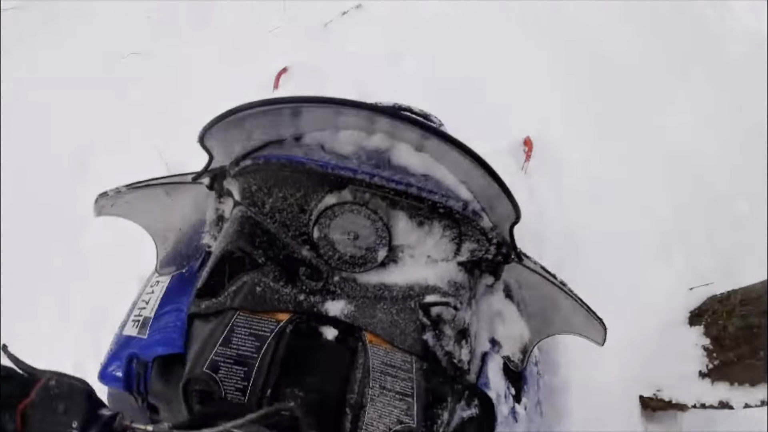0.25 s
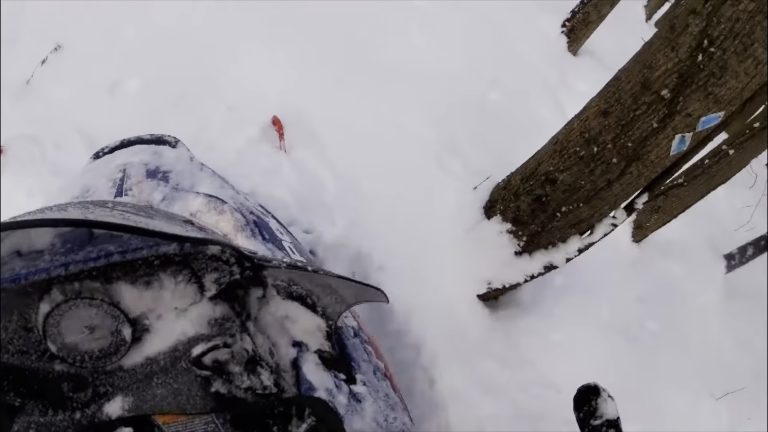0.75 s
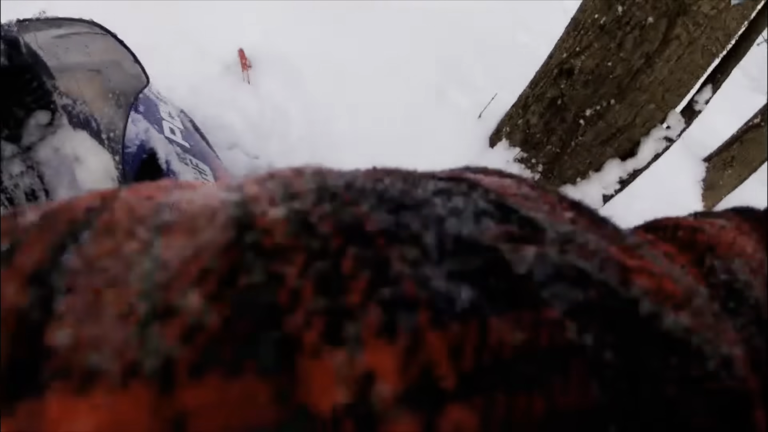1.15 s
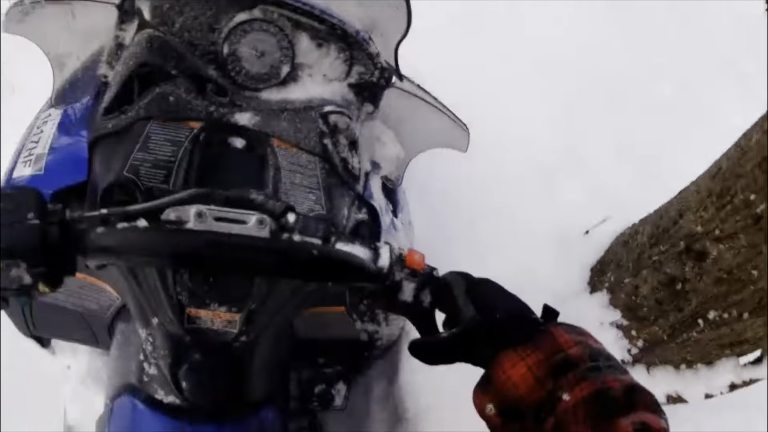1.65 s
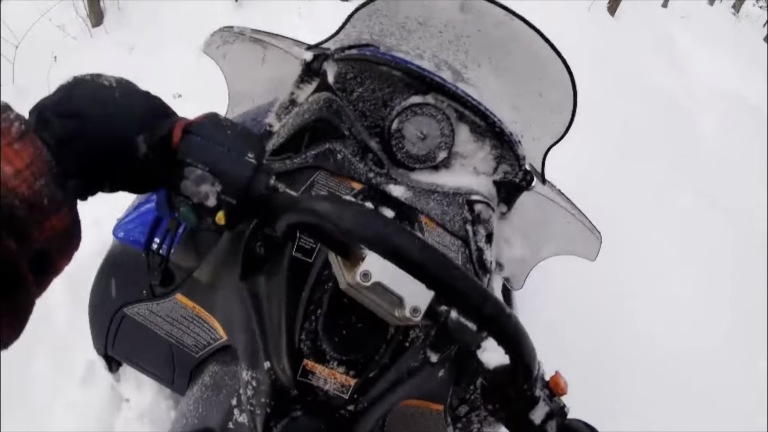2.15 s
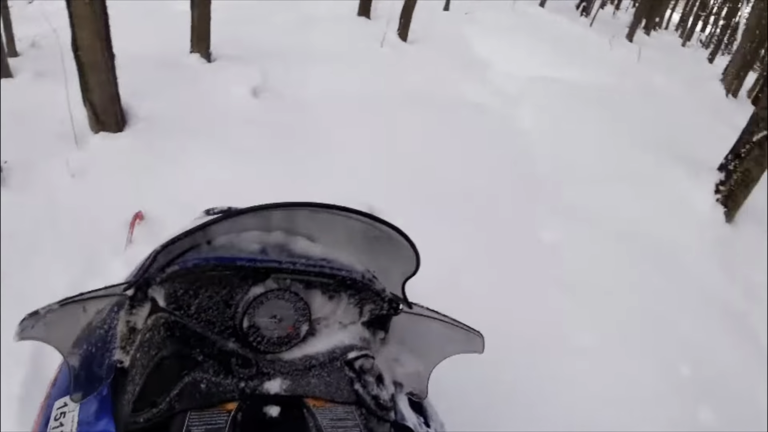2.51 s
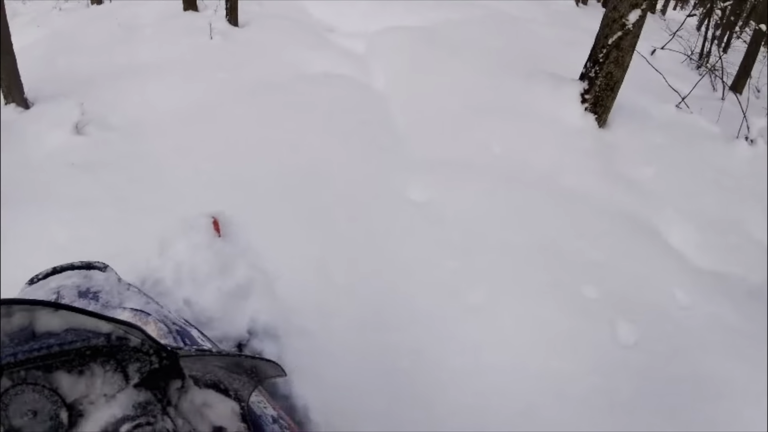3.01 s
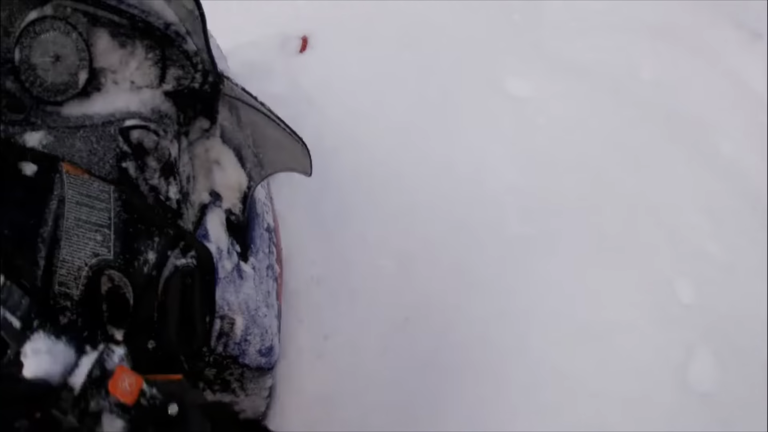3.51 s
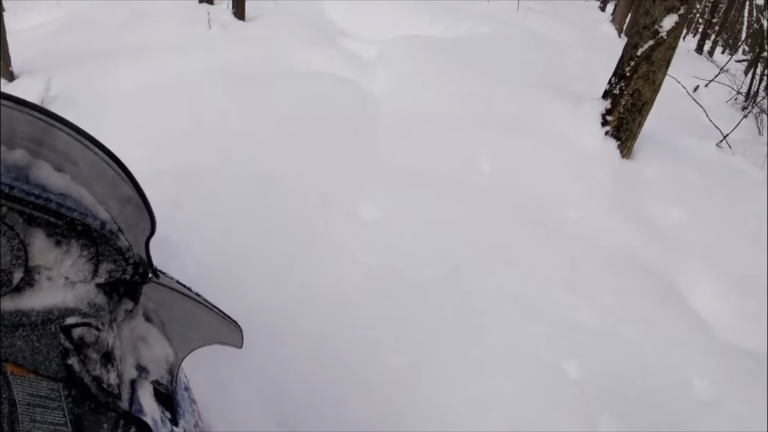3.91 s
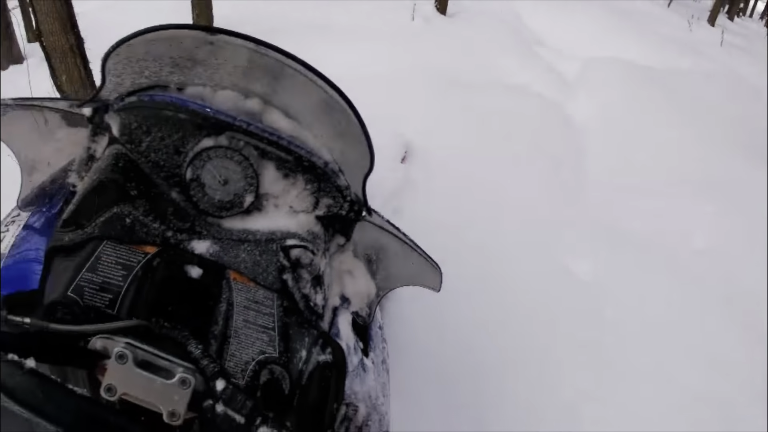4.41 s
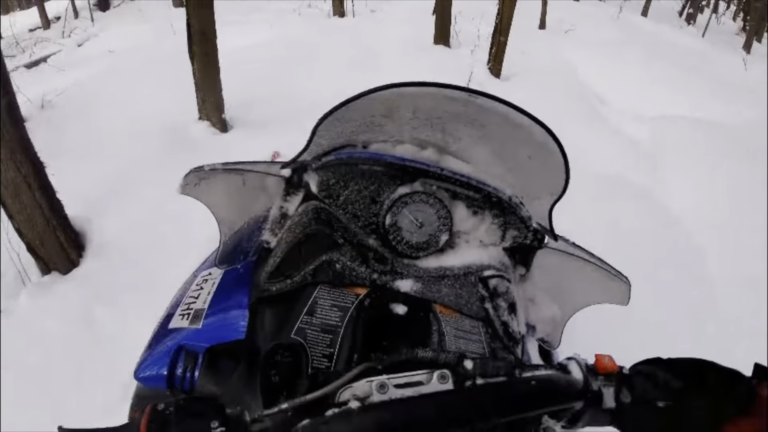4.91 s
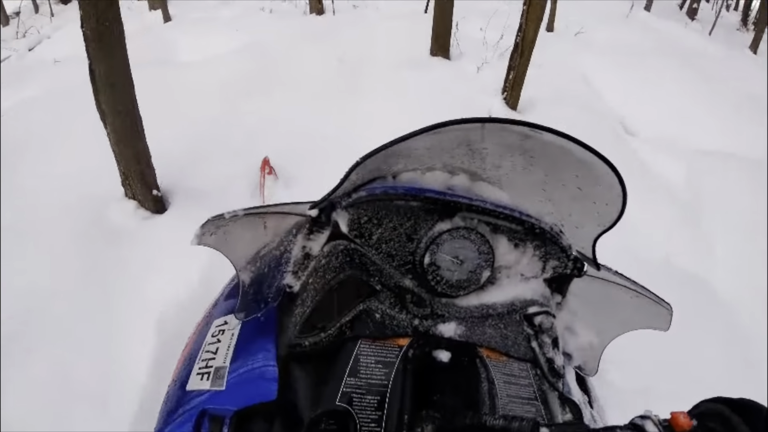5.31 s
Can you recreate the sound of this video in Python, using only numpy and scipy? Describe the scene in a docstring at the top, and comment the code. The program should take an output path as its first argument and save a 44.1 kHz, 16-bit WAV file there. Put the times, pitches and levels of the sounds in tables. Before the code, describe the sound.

A two-stroke snowmobile idles with a rattling burble and is revved four times, heard close from the rider's seat.

```python
"""A two-cylinder two-stroke snowmobile, blipped four times from idle, heard from the rider's helmet.
On the throttle the exhaust sings in clean multiples of the crank speed; off it the cylinders skip
firings and burble through pipe and muffler. Each blow clatters the panels and engine case and pulses
the intake hiss. The clutch rattles once a turn at idle, and the machine swishes as it lurches."""
import sys
import numpy as np
from scipy import signal
from scipy.fft import rfft, irfft
from scipy.io import wavfile
from scipy.ndimage import uniform_filter1d

SR = 44100
rng = np.random.default_rng(int(sys.argv[2]) if len(sys.argv) > 2 else 0)


def pcm_store(signal):
    """Save signal as 16-bit PCM."""
    levels = np.round(np.clip(np.atleast_2d(signal), -1, 1) * 32767)
    wavfile.write(sys.argv[1], SR, levels.astype(np.int16).T)


N = 244755


def amp(db):
    """Decibels to gain."""
    return 10 ** (np.asarray(db) / 20)


def rms_one(x):
    """Scale to rms 1."""
    return x / np.sqrt(np.mean(x ** 2) + 1e-20)


def levelled(x, window, floor=1e-9):
    """Ride the gain to hold the rms near 1 over a window of samples."""
    return x / np.sqrt(uniform_filter1d(x ** 2, window) + floor)


def in_time(rows):
    """Table columns as automation curves, one value per sample."""
    times, *columns = np.transpose(rows)
    return [np.interp(np.arange(N) / SR, times, column) for column in columns]


def at_hz(spectrum, hz):
    """Read an EQ curve on a log-frequency axis."""
    points_hz, db = np.transpose(spectrum)
    return np.interp(np.log(hz), np.log(points_hz), db)


def coloured(x, spectrum):
    """Shape a signal with an EQ curve."""
    hz = np.maximum(np.arange(N // 2 + 1) * SR / N, 1)
    return irfft(rfft(x) * amp(at_hz(spectrum, hz)), N)


def noise(hz, kind="low", order=2):
    """Filtered noise at rms 1; with a low cutoff, a slow drift."""
    return rms_one(signal.sosfilt(signal.butter(order, hz, kind, fs=SR, output="sos"), rng.standard_normal(N)))


def resonate(x, modes):
    """Parallel resonances with alternating signs; passing twice keeps the valleys dark."""
    out = np.zeros(N)
    for k, (hz, width, db) in enumerate(modes):
        r = np.exp(-np.pi * width / SR)
        gain = (1 - r * r) / 2
        stage = [gain, 0, -gain, 1, -2 * r * np.cos(2 * np.pi * hz / SR), r * r]
        out += (-1) ** k * amp(db) * signal.sosfilt([stage] * 2, x + 1e-18)
    return out


def dying(clicks, rise_s, fall_s):
    """Give each click a quick attack and an exponential decay."""
    rise, fall = np.exp(-1 / (rise_s * SR)), np.exp(-1 / (fall_s * SR))
    return signal.lfilter([1 - rise], np.convolve([1, -rise], [1, -fall]), clicks + 1e-18)


def by_speed(opened, shut, speed, throttle):
    """Levels at the crank speed, crossfaded between open and shut throttle."""
    def levels(rows):
        speeds, *columns = np.transpose(rows)
        return np.array([np.interp(speed, speeds, column) for column in columns])
    return throttle * levels(opened) + (1 - throttle) * levels(shut)


# The rev curve: (time [s], crank speed [turns/s])
REVS = [(0.0, 29.7), (0.3, 27.1), (0.6, 27.0), (0.79, 31.1), (0.99, 46.2), (1.11, 64.5), (1.19, 75.2),
        (1.3, 85.4), (1.45, 98.9), (1.5, 94.2), (1.93, 48.3), (2.15, 38.1), (2.46, 32.0), (3.07, 26.8),
        (3.15, 33.3), (3.21, 46.4), (3.29, 63.7), (3.35, 73.8), (3.42, 81.5), (3.55, 91.3), (3.8, 69.5),
        (3.88, 71.6), (3.99, 91.7), (4.13, 114.7), (4.19, 107.8), (4.335, 80.3), (4.4, 83.1), (4.5, 97.4),
        (4.575, 103.7), (4.81, 69.4), (5.19, 39.4), (5.55, 31.4)]
SPEED_FLOOR = 25   # turns/s, just under idle


def crank_speed():
    """Turns per second; the excess over the floor grows and dies exponentially."""
    log_excess, = in_time([(s, np.log(rate - SPEED_FLOOR)) for s, rate in REVS])
    return SPEED_FLOOR + np.exp(log_excess)


# Throttle blips and their mix trims:
# (opens [s], shuts [s], firing tone [dB], octave [dB], overtones [dB], clatter [dB])
THROTTLE_BLIPS = [(0.824, 1.395, 2.5, -0.9, -0.7, -2), (3.091, 3.541, 3.5, -2, 1.5, -0.8),
                  (3.798, 4.122, 3.5, -1, -9, 4), (4.303, 4.556, 3.5, -6, -6.5, 2)]


def throttle_lever(squeeze_s=0.087):
    """The thumb squeezes and lets go: throttle 0-1, and each blip's trims while it lasts."""
    t = np.arange(N) / SR
    inside_s = np.array([np.minimum(t - opens, shuts - t) for opens, shuts, *_ in THROTTLE_BLIPS])
    held = np.clip(inside_s / squeeze_s + .5, 0, 1)
    return held.sum(axis=0), np.transpose(THROTTLE_BLIPS)[2:] @ held


def firings(turns, refill=.36, uneven=.15):
    """A cylinder needs a few turns to gather a charge that lights: each stroke's sample and strength."""
    strokes = np.flatnonzero(np.diff(np.floor(2 * turns)))
    luck = rng.standard_normal((1200, 2))
    charge, strength = [0, 0], np.zeros(len(strokes))
    for k in range(len(strokes)):
        cylinder = k % 2
        charge[cylinder] += refill
        if charge[cylinder] > 1 + uneven * luck[k, 0]:
            strength[k] = amp(1.27 * luck[k, 1])
            charge[cylinder] = 0
    return strokes, strength


# Exhaust mix, throttle open and shut:
# (crank speed [turns/s], shake [dB], firing tone [dB], octave [dB], overtones [dB], burble [dB])
EXHAUST_ON = [(33, -44, -20.5, -10, -42, -15.5), (46.4, -44.5, -16, -24, -37.5, -13),
              (59, -41.5, -11, -14.5, -22, -17), (70.8, -30, -12, -14.5, -27, -24.5),
              (78.4, -18.5, -14, -17.5, -31, -16), (91.7, -18, -13.5, -11.5, -31.5, -23),
              (103, -16.5, -9.5, -28.5, -48, -16), (113, -15, -7.5, -26, -28, -25)]
EXHAUST_OFF = [(27.3, -42, -22.5, -18, -48.5, -16), (29.3, -46, -20, -21, -42.5, -13.5),
               (33, -41.5, -17, -21.5, -40, -16), (39.9, -28.5, -17.5, -24, -26, -21.5),
               (50.8, -26, -22.5, -36, -41.5, -18), (61, -25.5, -23, -56, -37, -15),
               (72, -18.5, -18, -28, -37.5, -19.5), (85, -17.5, -19, -26, -49.5, -17),
               (96.2, -14, -19.5, -19.5, -46.5, -18.5), (108, -11.5, -24.5, -24.5, -40, -17)]
# Fader rides as the rider moves: (time [s], low tones [dB], overtones [dB], burble [dB])
EXHAUST_RIDES = [(0.0, 1.7, 3.5, 1), (0.5, 0.3, -3, 1.2), (0.95, 0.6, 0.1, 0.3), (1.2, 0, 2, -2.5),
                 (1.5, 1, 2, -0.3), (1.85, -1, -1, -1), (2.2, 0, 2.5, 0), (2.6, 1.5, 0.1, -1.4),
                 (3.05, -0.5, 4, 1.7), (3.35, -0.4, 0.5, -1.5), (3.65, -0.4, -0.7, -0.1),
                 (4.2, -1.3, 0.7, 0.7), (4.65, 0.3, 2.5, 1.4), (4.95, -3, 1, -3), (5.2, -1, -1, -0.5),
                 (5.55, 2.7, 2, -0.5)]


def exhaust(speed, turns, throttle, strokes, strength, trims_db, waver_db=2.0):
    """Tones over a burble; off the throttle, uneven firing makes each tone waver."""
    *tones_db, burble_db = by_speed(EXHAUST_ON, EXHAUST_OFF, speed, throttle)
    low_ride, overtone_ride, burble_ride = in_time(EXHAUST_RIDES)
    tones_db = np.array(tones_db) + [low_ride, low_ride, low_ride, overtone_ride]
    tones_db[1:] += trims_db
    tones_db += [waver_db * (1 - throttle) * noise(hz=5) for _ in tones_db]
    # On the overrun the blows come early or late, fraying the higher orders.
    ragged = .03 * np.clip(speed / 80, 0, 1) * (1 - .85 * throttle) * noise(hz=14)
    tones = exhaust_tones(speed, 2 * np.pi * (turns + ragged), *tones_db)
    return tones + amp(burble_db + burble_ride) * burble(speed, throttle, strokes, strength)


# The exhaust's upper voices: (order [cycles/turn], level [dB])
UPPER_ORDERS = [(3, -24.5), (5, -14.5), (6, 6), (7, -11.5), (8, -5.5), (9, -25), (10, -11), (12, -25)]
# The silencer's pass bands: (frequency [Hz], gain [dB])
SILENCER_EQ = [(40, 13), (110, 1), (170, -12), (240, 2.5), (300, 0), (380, -3.5), (480, -7), (620, 2),
               (800, -73.5), (1400, -32.5)]


def exhaust_tones(speed, phase, shake_db, firing_db, octave_db, overtone_db):
    """Orders of the crank; the silencer's pass bands tip the overtones against the sixth order."""
    out = skip_tone(phase)
    for order, db in ((1, shake_db), (2, firing_db), (4, octave_db)):
        out += amp(db) * np.sin(order * phase)
    for order, db in UPPER_ORDERS:
        passed_db = at_hz(SILENCER_EQ, order * speed) - at_hz(SILENCER_EQ, 6 * speed)
        out += amp(overtone_db + db + passed_db) * np.sin(order * phase)
    return np.sqrt(2) * out


# Deep muffler chambers and the hollow pipe: (frequency [Hz], width [Hz], level [dB])
MUFFLER_MODES = [(34.8, 35, -6.5), (76.2, 33.3, -2.5), (115, 55, -6.5)]
PIPE_MODES = [(152, 103, 1), (265.6, 127, 1.5), (308, 113.4, 2), (391.6, 87.4, -3), (494.6, 95, -10.5)]


def burble(speed, throttle, strokes, strength):
    """Uneven blows and rushing gas ring muffler and pipe; throttle softens the blows and the rumble."""
    blows = np.zeros(N)
    blows[strokes] = (strength - strength.mean()) / np.sqrt(speed[strokes])
    blows *= 1 - .65 * throttle
    gas = rng.standard_normal(N)
    muffler, pipe = (rms_one(resonate(blows, modes)) + 2 * rms_one(resonate(gas, modes))
                     for modes in (MUFFLER_MODES, PIPE_MODES))
    rumble_db = 6.5 - 9 * throttle - .069 * speed
    return levelled(amp(rumble_db) * muffler + pipe, SR // 8)


def piston_slap(speed, throttle, strokes, load_db=5):
    """One short clack repeats, strong then weak; under load it is louder and tightens into a buzz."""
    luck = rng.standard_normal((1200, 2))[:len(strokes)]
    late_samples = (np.abs(luck[:, 0]) * (12 - 10 * throttle[strokes])).astype(int)
    accent = np.where(np.arange(len(strokes)) % 2, 1, .4)
    taps = np.zeros(N)
    taps[np.minimum(strokes + late_samples, N - 1)] = accent * amp(1.5 * luck[:, 1])
    clack = rng.standard_normal(400) * np.exp(-np.arange(400) / 260)
    slap = signal.fftconvolve(taps, rms_one(clack) / np.sqrt(400))[:N]
    speed_gain = np.sqrt(SR / speed) * np.clip(speed / 90, .15, .9)
    load_gain = amp(load_db * throttle) * (.55 + .4 * throttle)
    return slap * speed_gain * load_gain


def throb(strokes, strength, fall_s, steady):
    """Noise that swells at each blow, more for the near cylinder, over a steady bed."""
    blows = np.zeros(N)
    blows[strokes] = (1.1 + strength) * np.where(np.arange(len(strokes)) % 2, 1, .65)
    pulse = levelled(dying(blows, .005, fall_s), SR // 6)
    return (pulse + steady) * rng.standard_normal(N)


def panel(drive, modes, speed):
    """A rung panel; as the revs rise, the weight of its ring shifts to the higher modes."""
    climb_db = .14 * (speed - 75)
    lowest, second, rest = (resonate(drive, part) for part in (modes[:1], modes[1:2], modes[2:]))
    ring = lowest - amp(climb_db) * second + amp(climb_db / 2) * rest
    return levelled(ring, SR // 4, floor=1e-12)


# The ring of tunnel, hood, cooling fins and engine case: (frequency [Hz], width [Hz], level [dB])
TUNNEL_MODES = [(528, 280, 2.5), (810, 450, 4)]
HOOD_MODES = [(970, 190, -3), (1120, 170, 0), (1310, 200, -7)]
FIN_MODES = [(1480, 190, -2), (1640, 150, 0)]
CASE_MODES = [(1830, 170, 0), (2020, 170, -1), (2350, 400, -11)]
# Engine bay mix, throttle open and shut:
# (crank speed [turns/s], tunnel [dB], hood [dB], fins [dB], case [dB], intake [dB])
BAY_ON = [(30, -34.5, -35.5, -37.5, -40.5, -42.5), (50, -35.5, -34.5, -31.5, -37, -41.5),
          (71, -40, -37.5, -35.5, -34, -40.5), (82, -31, -31, -35, -31, -38.5),
          (106, -35.5, -30.5, -37, -31, -38), (113, -32, -34, -29, -37, -36)]
BAY_OFF = [(26.8, -37.5, -43, -42.5, -42, -48), (31.5, -42, -38.5, -41, -41, -47.5),
           (40, -48, -38.5, -45.5, -43.5, -52.5), (52, -45, -40.5, -39.5, -38.5, -48.5),
           (67.5, -41.5, -35, -39, -36.5, -43.5), (91.6, -37, -30, -33.5, -33.5, -38.5),
           (111, -32, -25.5, -30.5, -24.5, -35)]
# Fader rides as the rider's head and body move: (time [s], hood [dB], fins [dB], case [dB], intake [dB])
BAY_RIDES = [(0.0, 8.5, 2, -3, 6), (0.55, -0.8, 0, -5, 0.5), (0.72, 6, 4.5, 2.5, 5.5),
             (1.2, 3.3, -2, 0, -2.5), (1.37, -2.5, -2, 0, -3), (1.46, 2, -6, -3, -0.7),
             (1.6, -2, 0, -3.5, -1.5), (2.15, 2.5, 1.5, 0.3, 1.6), (2.62, -2.5, -1, -2.5, -1.5),
             (2.72, -0.5, 5.5, -2.5, 1.5), (3.03, -5, 2.5, -4, 0.5), (3.3, 4.5, -2.5, 2.5, 0.5),
             (3.65, 3.5, 1.5, 3, 2.5), (3.9, -2, -1, -4.5, -0.2), (4.2, -5.5, 5.5, -5.5, -0.5),
             (4.6, 0.5, 6, -3.8, 0.5), (5.0, 0.5, -3, -2.5, -2), (5.55, -2.5, 1.5, 0.5, 2.3)]


def engine_bay(speed, throttle, strokes, strength, clatter_trim_db):
    """Blows and piston slap set four parts of the machine clattering, with the intake hiss on top."""
    levels_db = by_speed(BAY_ON, BAY_OFF, speed, throttle)
    levels_db[1:] += in_time(BAY_RIDES)
    *panels_db, intake_db = levels_db
    slap = piston_slap(speed, throttle, strokes)
    lift_db = clatter_trim_db + jolts()
    clatter = np.zeros(N)
    for db, modes in zip(panels_db, (TUNNEL_MODES, HOOD_MODES, FIN_MODES, CASE_MODES)):
        drive = rms_one(throb(strokes, strength, fall_s=.01, steady=.28)) + slap
        clatter += amp(db + lift_db) * panel(drive, modes, speed)
    return clatter + amp(intake_db) * intake_hiss(strokes, strength)


# The colour of the intake air: (frequency [Hz], gain [dB])
HISS_EQ = [(1800, -16), (2400, -1), (3000, -4.5), (4000, -10), (5500, -11.5), (6500, -18.5), (7300, -27),
           (9000, -25), (10300, -31), (11000, -39), (14500, -39), (15600, -52)]


def intake_hiss(strokes, strength):
    """Air drawn into the engine hisses, pulsing gently with each stroke."""
    return rms_one(coloured(throb(strokes, strength, fall_s=.013, steady=.78), HISS_EQ))


# The clutch's accented knocks: (time [s], level [dB])
CLUTCH_KNOCKS = [(0.071, -29.5), (0.1062, -29), (0.1386, -32), (0.2099, -38), (0.3326, -39), (0.5581, -33),
                 (0.7711, -26.5), (0.7914, -27), (0.8544, -37), (2.468, -32.5), (2.6854, -29),
                 (2.785, -28.5), (2.8205, -30), (2.8624, -33), (2.9354, -29.5), (2.9698, -23.5),
                 (3.0355, -29), (3.0814, -33), (3.1203, -30.5), (3.1906, -27), (4.086, -30)]


def clutch_rattle(speed, strokes, soft_db=-43.5, spread_db=6.5, accent_trim_db=-4.5):
    """The clutch knocks once a turn, fading as the revs rise; each burst is brighter than the hiss."""
    each_turn = strokes[::2]
    luck = rng.standard_normal(600)[:len(each_turn)]
    fade_db = 2 * (speed[each_turn] - SPEED_FLOOR)
    knocks = np.zeros(N)
    knocks[each_turn] = amp(soft_db + spread_db * luck - fade_db)
    for s, db in CLUTCH_KNOCKS:
        knocks[round(s * SR)] = amp(db + accent_trim_db)
    hiss = coloured(rng.standard_normal(N), HISS_EQ)
    bright = signal.sosfilt(signal.butter(1, 3500, "high", fs=SR, output="sos"), hiss)
    return dying(knocks, rise_s=.003, fall_s=.005) * rms_one(bright)


# Jolts that shake all the panels: (time [s], lift [dB])
PANEL_JOLTS = [(0.663, 6.5), (1.05, 6.5), (1.41, 7), (2.68, 2.5), (3.12, 5), (3.95, 5.5), (4.11, 4.5),
               (4.44, 3.5), (4.54, 2.5)]


def jolts():
    """Each jolt lifts the clatter for a moment, in dB."""
    hits = np.zeros(N)
    for s, db in PANEL_JOLTS:
        hits[round(s * SR)] = db
    return dying(hits, rise_s=.00099, fall_s=.026)


# Two faint swishes: (time [s], level [dB])
SWISH_FADER = [(3.09, -87), (3.13, -61), (3.25, -57), (3.32, -73), (3.88, -79), (3.93, -60), (4.25, -66),
               (4.33, -91)]


def swish():
    """Smooth, airy noise high above the engine as the machine lurches."""
    return amp(in_time(SWISH_FADER)[0]) * noise([7600, 10400], "band", order=3)


# A brief note as the third blip shuts: (time [s], level [dB])
SKIP_FADER = [(4.15, -55), (4.18, -13.5), (4.27, -21), (4.31, -68)]


def skip_tone(phase):
    """The exhaust sounds between its orders, at 2.5 cycles a turn, as the throttle shuts."""
    return amp(in_time(SKIP_FADER)[0]) * np.sin(2.5 * phase)


def scene():
    """One crank drives exhaust, engine bay and clutch; mono and dry, as snow swallows the echoes."""
    speed = crank_speed()
    throttle, trims_db = throttle_lever()
    turns = np.cumsum(speed) / SR
    strokes, strength = firings(turns)
    mix = exhaust(speed, turns, throttle, strokes, strength, trims_db[:3])
    mix += engine_bay(speed, throttle, strokes, strength, trims_db[3])
    return (mix + clutch_rattle(speed, strokes) + swish())[None]


def record(dry, low_cut_hz=40, high_cut_hz=15700):
    """The small microphone drops the deepest bass, peaks are rounded, the top is cut."""
    thin = signal.sosfilt(signal.butter(2, low_cut_hz, "high", fs=SR, output="sos"), dry)
    rounded = .9 * np.tanh(thin / .95)
    return signal.sosfilt(signal.cheby2(12, 70, high_cut_hz, fs=SR, output="sos"), rounded)


dry = scene()
out = record(dry)
pcm_store(out)
```